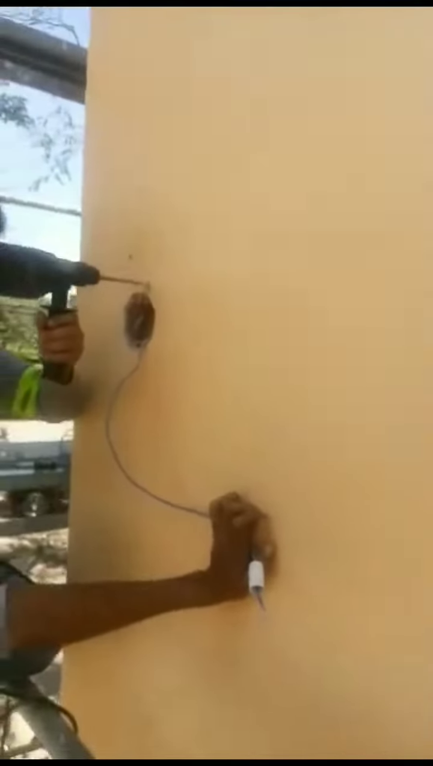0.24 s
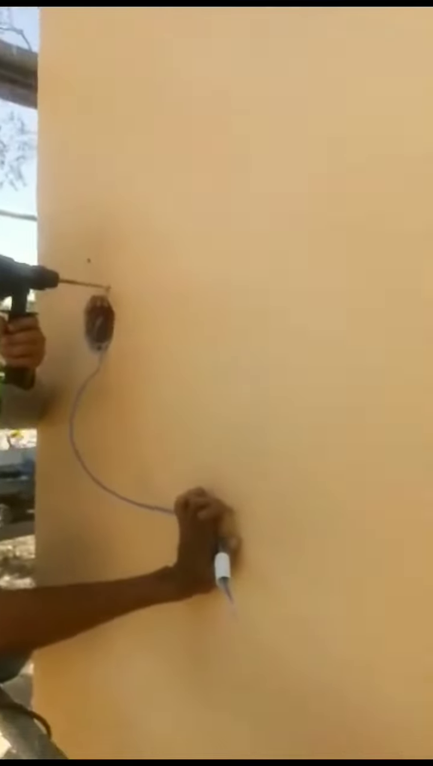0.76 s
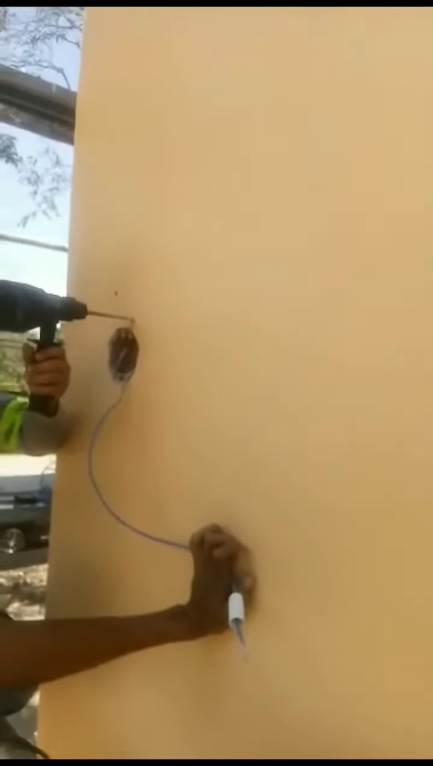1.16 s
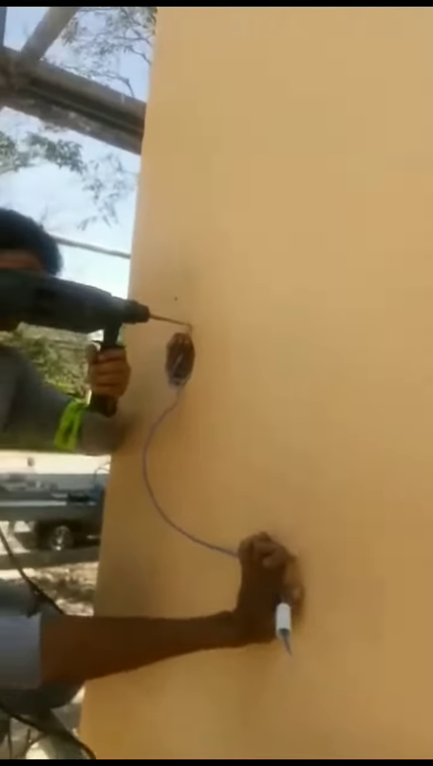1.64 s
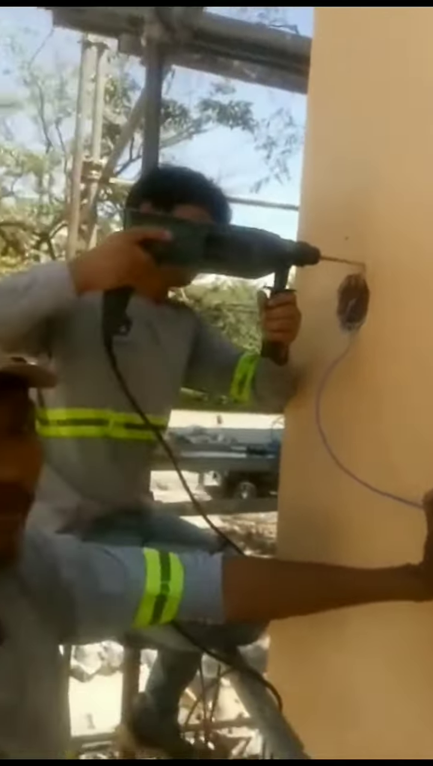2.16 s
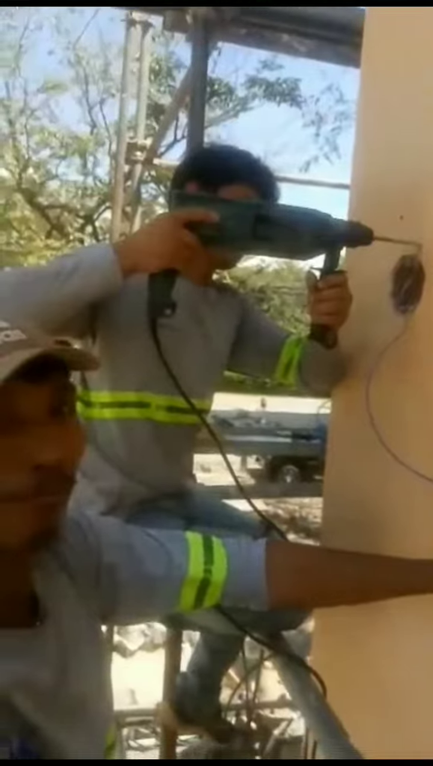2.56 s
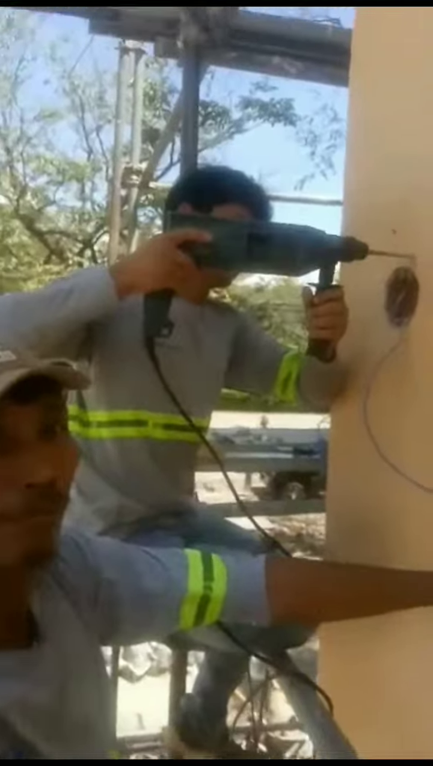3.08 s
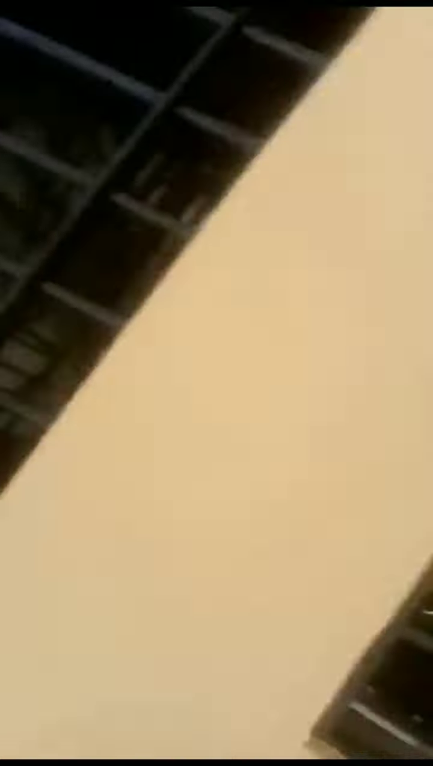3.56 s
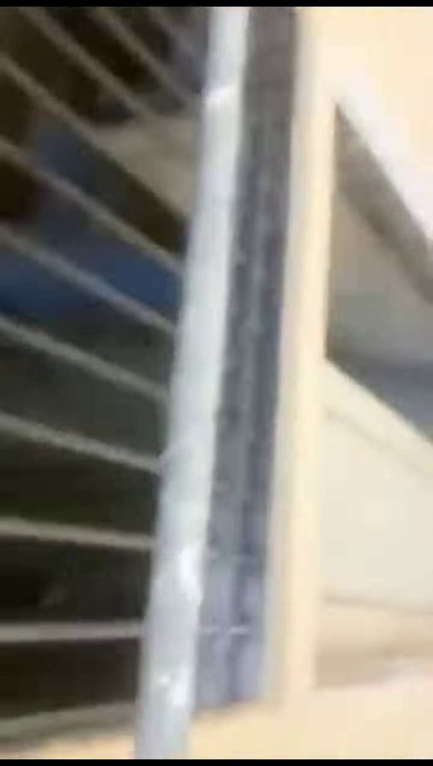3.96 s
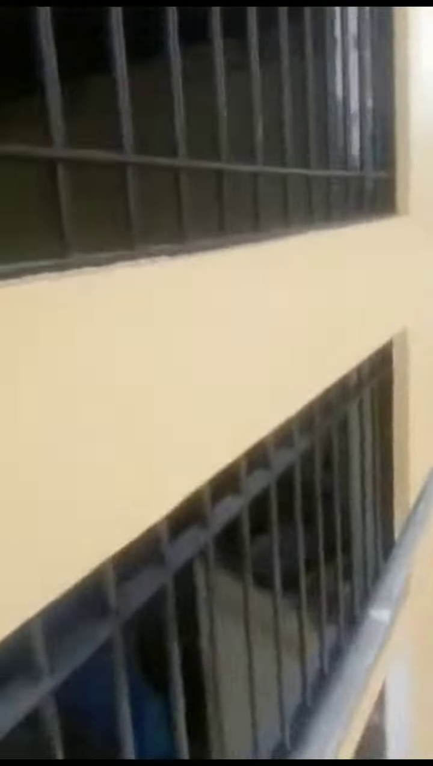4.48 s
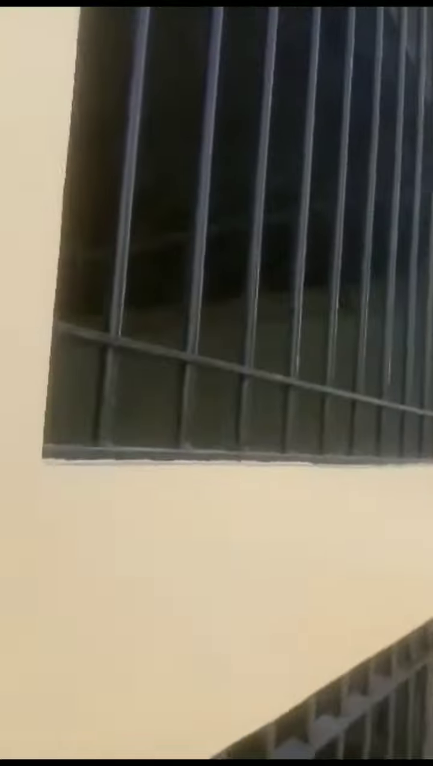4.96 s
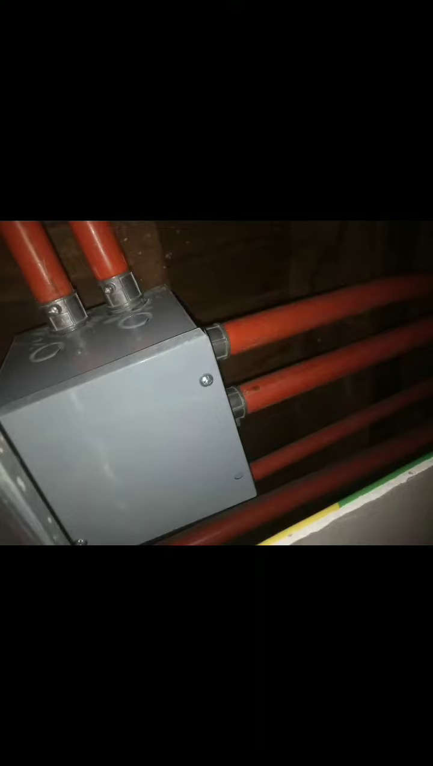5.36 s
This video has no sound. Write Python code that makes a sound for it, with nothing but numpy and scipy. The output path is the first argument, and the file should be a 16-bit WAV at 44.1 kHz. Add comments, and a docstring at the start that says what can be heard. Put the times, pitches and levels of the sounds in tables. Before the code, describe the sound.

A hammer drill is already boring into a plastered masonry wall close to the microphone. Its very fast blows make a bright, ringing steel clatter and a hissing crunch of stone, over a quieter hum from the housing. Faint wind rumbles on the microphone throughout. The motor briefly races and rises in pitch at about 1.3, 1.9, 3.1, 3.7 and 4.4 seconds, sagging back each time. Between 3.3 and 4 seconds fingers knock dully on the microphone as it swings along the wall, and the drill's tone sweeps, dips a little and turns hollow. From about 4.1 seconds the drilling grows louder, with sharp ticks of cracking grit and a few soft, low finger rubs. It is loudest just before all sound cuts off abruptly at about 5 seconds.

```python
"""On a scaffold, close to a plastered masonry wall, a hammer drill bores a hole.
A striker inside hits the bit about sixty times a second, faster whenever the load eases.
Each blow makes steel clatter and stone crunch, while the crank hums through the housing.
Air rumbles on the microphone, and fingers knock and rub it as it swings round beside the wall,
where the bit is louder. Then all sound cuts off."""
import sys
import numpy as np
from scipy import signal
from scipy.fft import rfft, irfft
from scipy.io import wavfile
from scipy.ndimage import uniform_filter1d, map_coordinates

SR = 44100
rng = np.random.default_rng(int(sys.argv[2]) if len(sys.argv) > 2 else 0)


def file_out(sig):
    """Save sig as 16-bit WAV at sys.argv[1]."""
    # one column per channel
    cols = np.atleast_2d(sig).T
    # limit, then scale
    lim = np.clip(cols, -1, 1)
    pcm = np.round(lim * 32767).astype(np.int16)
    wavfile.write(sys.argv[1], SR, pcm)


N = 247842
TIME = np.arange(N) / SR
HZ = np.fft.rfftfreq(4096, 1 / SR)

# Tone colours of air, housing, steel and stone. Each row: frequency in Hz, relative level in dB.
WIND_COLOUR = [(20, -30), (35, -21.5), (60, -4), (100, -2), (160, -4), (260, -9.5), (500, -21),
               (1200, -40.5)]
HOUSING_COLOUR = [(40, -14.5), (130, -11), (350, -2.5), (500, 4.5), (620, -6), (690, 3), (735, 6),
                  (790, -2), (840, -6.5), (1000, 6), (1500, -19.5)]
STEEL_COLOUR = [(500, -34), (830, -22), (950, -13.5), (1500, -8.5), (2200, -12), (2650, -13), (3200, -8.5),
                (4200, -11.5), (6000, -11.5), (7000, -14), (8000, -24.5), (11000, -26)]
STONE_FAR = [(4000, -23.5), (7000, -14), (8200, -7.5), (9400, -3.5), (10300, 1.5), (11200, 3),
             (11700, -1.5), (12400, 2.5), (13200, -7)]
STONE_NEAR = [(4000, -31), (7000, 2), (8200, 4), (9000, 2.5), (9800, 4), (10600, 4.5), (11300, 3.5),
              (12400, 3.5), (13200, -7.5)]
# Fingers sliding on the microphone. Each row: start in seconds, length in seconds, level in dB.
RUBS = [(4.128, 0.21, -40.5), (4.74, 0.1, -44), (4.9, 0.18, -42)]
# Fingers knocking it. Each row: time in seconds, relative level in dB, half the treble cutoff in Hz.
KNOCKS = [(2.109, -38, 644), (2.139, -35.5, 615), (3.347, -24, 600), (3.445, -33.5, 600),
          (3.616, -24.5, 605), (3.77, -33.5, 600), (3.857, -29, 600), (3.929, -23.5, 600)]
# The microphone's path. Each row: time in seconds, place number
# (0 behind the drill, 1 at its side, 2 turned away, 3 along the wall, 4 or more near the bit).
MIC_PATH = [(1, 0), (1.8, 0.82), (2.7, 0.4), (3.33, 0.73), (3.47, 6), (3.72, 5), (4, 2.5), (4.35, 3.5),
            (4.65, 3.5), (4.8, 4)]
# The wall's echo. Each row: time in seconds, delay in seconds, strength as a share of the direct sound.
WALL_ECHO = [(3.26, 0.00005, 0), (3.37, 0.000089, 0.47), (3.45, 0.00011, 0.54), (3.7, .000168, 0.047),
             (3.92, 0.00021, 0.13), (4.3, .00022, 0.26), (4.7, 0.00023, 0.13)]
# Dips in the tone when facing away. Each row: frequency in Hz, width in Hz, depth in dB.
HOLLOWS = [(2360, 490, -4.5), (5480, 430, -4)]
# The load eases and the motor races. Each row: start in seconds, length in seconds.
SURGES = [(1.2605, 0.1775), (1.9209, 0.3251), (3.0753, 0.3237), (3.7417, 0.3043), (4.4248, 0.3817)]
# The bit catches (+) or slips (-). Each row: middle in seconds, length in seconds, change in dB.
CATCHES = [(.26, 0.15, 2.5), (0.392, 0.057, -4.5), (0.792, 0.17, 1.5), (1.069, 0.047, -3.5),
           (1.39, 0.045, 1.5), (1.79, 0.18, -1.5), (1.926, 0.069, 2.5), (2.388, 0.048, -3),
           (2.808, 0.056, 1.5), (2.845, 0.09, -3), (2.903, 0.12, 1.5), (4.394, 0.12, -4),
           (4.483, 0.055, -1.5), (4.747, 0.061, -3.5)]
# The housing's loudness. Each row: time in seconds, relative levels of hum and of shaking in dB.
HOUSING_LEVELS = [(0, -46.5, -49.5), (3, -47.5, -50.5), (3.7, -46.5, -46), (4.35, -43, -44),
                  (4.6, -40.5, -42.5), (5.05, -37, -40)]
# The tones in the crank's hum. Each row: multiple of the blow rate, relative level in dB.
CRANK_TONES = [(1, -8), (2, -1), (3, -1), (4, 0), (5, -3.5), (6, -0.5), (7, -9), (8, -0.5), (9, -4),
               (10, -3.5), (11, 2), (12, -3.5), (13, -7), (14, -5.5)]
# Resonances of the plastic shell. Each row: frequency in Hz, width in Hz, level of the added part in dB.
SHELL_RESONANCES = [(577, 21.8, -0.5), (730.4, 39, 6.5)]
# The loudest grains breaking under the bit. Each row: time in seconds, relative level in dB.
LOUD_CRACKS = [(0.2054, -21), (0.4349, -13), (0.7327, -18), (3.374, -17), (4.1283, -5), (4.2353, -6.5),
               (4.5155, -1), (4.6438, -6), (4.7257, -4), (4.7935, -8), (4.8228, -5.5)]
# Long, thin rings of the bit and the chuck that holds it. Each row: pitch in Hz, relative level in dB.
STEEL_RINGS = [(969, -7), (1196, -7.5), (1253, -0.5), (1824, -3.5), (1938, -3.5), (2334, 1), (2450, 3.5),
               (2750, -3), (4830, -8.5), (4930, -3)]
# The clatter's resonances at each place. Each row: pitch in Hz, rough width in Hz, relative level in dB.
BEHIND = [(977, 170, -5), (1266, 41, 1), (1353, 400, -7), (1940, 350, -5), (2354, 149.0, -6),
          (2374, 8.7, 0.5), (2870, 220, -3.5), (3230, 660, -3.5), (4850, 200, -6.5), (5210, 620.0, -6.5),
          (6590, 332.0, -9.5)]
ASIDE = [(925, 106.0, -8.5), (1354, 230, -6), (1940, 110, -5.5), (2463, 130, -3.5), (2930, 100, -2.5),
         (3580, 640, -4), (4850, 160, -4.0), (6540, 340, -6.5)]
AWAY = [(955.0, 132.0, -16.5), (1446, 118.0, -1), (1974, 58.0, 0), (2890.0, 164.0, -15),
        (4080, 366.0, -10.5), (4832.0, 340, -6), (6354.0, 1400, -10)]
ALONG = [(1290, 42, -7), (1670, 46.0, -5.5), (3070, 500, -3.5), (4040, 530, -3.5), (4800, 440, -7),
         (6440, 920, -1.5)]
NEAR = [(971, 153.0, -12), (1830, 580, -9.5), (3135.0, 237.0, -15.5), (4252.0, 1300, -6), (4840, 500, -3.5),
        (6340, 2100, -12.5)]
# Loudness along the path. Each row: time in seconds, base levels of steel and of stone in dB.
DRILL_LEVELS = [(0, -27, -34.5), (.7, -25.5, -31.5), (1.4, -27.5, -36.5), (2.2, -27, -35),
                (2.6, -27.5, -35.5), (3.05, -27, -34), (3.2, -26, -33.5), (3.39, -27.5, -31.5),
                (3.66, -31, -36), (3.78, -29.5, -31.5), (4.04, -27.5, -34), (4.13, -25, -33),
                (4.5, -24, -31), (4.8, -22, -31), (5.05, -20.5, -30.5)]


def amp(db):
    """Turns decibels into a number to multiply by."""
    return 10 ** (np.asarray(db) / 20)


def unit(x):
    """Scales a signal to an average power of 1."""
    return x / np.sqrt(np.mean(x ** 2) + 1e-20)


def curve(rows, column=1):
    """Joins a table's points in time with straight lines."""
    rows = np.array(rows)
    return np.interp(TIME, rows[:, 0], rows[:, column])


def shape(points):
    """Turns a tone colour table into a gain for every frequency."""
    hz, db = np.transpose(points)
    return amp(np.interp(np.log(HZ + 1), np.log(hz), db))


def colour(x, gain):
    """Gives a sound a tone colour; white noise keeps its power."""
    log_gain = np.log(np.maximum(np.r_[gain, gain[-2:0:-1]], 1e-5))
    taps = np.fft.ifft(np.exp(np.conj(signal.hilbert(log_gain)))).real  # rings only after a hit
    return signal.oaconvolve(x, taps / np.linalg.norm(taps))[:N]


def waver(hz):
    """A random wobble of about size 1, up to the given rate."""
    steps = rng.standard_normal(4000)
    return unit(np.interp(TIME * 2 * hz, np.arange(len(steps)), steps))


def add(mix, start_s, sound):
    """Mixes a sound in at the given time."""
    part = mix[max(round(start_s * SR), 0):][:len(sound)]
    part += sound[:len(part)]


def strikes(turns, spread_db, jitter_s):
    """One click for each turn of the crank, uneven in strength and timing."""
    on_time = np.flatnonzero(np.diff(np.floor(turns)) > 0)
    size, late = rng.standard_normal((len(on_time), 2)).T
    at = on_time + np.round(late * jitter_s * SR).astype(int)
    clicks = np.zeros(N)
    clicks[np.clip(at, 0, N - 1)] = amp(spread_db * np.clip(size, -2, 2))
    return clicks


def linger(power, decay_s):
    """Lets each burst of power die away; the result averages 1."""
    out = signal.lfilter([1], [1, -np.exp(-1 / (decay_s * SR))], power)
    return out / out.mean()


def bursts(turns, decay_s, rebound, grit, scrape, spread_db):
    """Loudness over time of the blows, the bit bouncing back, loose grit and steady scraping."""
    blow = strikes(turns, spread_db, jitter_s=0.00025)
    bounce = strikes(turns + .235, spread_db, jitter_s=.0008)
    grains = np.zeros(N)
    grains[rng.integers(0, N, size=2500)] = amp(2.0 * np.minimum(rng.exponential(size=2500), 4))
    power = linger(blow ** 2, decay_s) + rebound * linger(bounce ** 2, decay_s)
    power += grit * linger(grains ** 2, decay_s=0.00054)
    power = power + .5 * linger(power, decay_s=0.0077) + scrape
    return unit(np.sqrt(np.abs(uniform_filter1d(power, size=20))))


def wind(level_db=-53, gust_db=2.0):
    """Air on the microphone makes a low, lumpy rumble."""
    return colour(rng.standard_normal(N), shape(WIND_COLOUR)) * amp(level_db + gust_db * waver(hz=8.2))


def finger_rubs():
    """Skin drags over the microphone's case with a soft, low scuff."""
    swell = np.zeros(N)
    for start, length, db in RUBS:
        add(swell, start, amp(db) * np.hanning(round(length * SR)))
    scuff = shape([(50, -21.5), (110, -8), (170, 2), (240, -10.5), (600, -36), (2000, -74)])
    return swell * colour(rng.standard_normal(N), scuff)


def finger_knocks(case_hz=95, decay_s=0.0039, snap_s=0.00042, boost_db=4):
    """A finger snaps against the microphone's case, which swings back in one dull thump."""
    out, t = np.zeros(N), TIME[:SR // 25]
    thump = 1.2 * np.sin(2 * np.pi * case_hz * t) * np.exp(-t / decay_s) - 2.5 * np.exp(-t / snap_s)
    for start, db, hz in KNOCKS:
        dulled = signal.lfilter(*signal.butter(1, 2 * hz, fs=SR), thump)
        add(out, start + 0.0011, amp(db + boost_db) * dulled)
    return out


def wall_echo(x):
    """The echo comes later as the microphone swings out, so peaks and dips in the tone slide down."""
    echo = map_coordinates(x, [np.arange(N) - curve(WALL_ECHO) * SR], order=3)
    share = curve(WALL_ECHO, column=2)
    return (x + share * echo) / np.sqrt(1 + share ** 2)


def facing_away(x, place, deepest=1.9, reach=1.5):
    """The drill sounds hollow when the microphone faces away from it."""
    dips_db = sum(db / (1 + (2 * (HZ - hz) / width) ** 2) for hz, width, db in HOLLOWS)
    turned = np.maximum(1 - ((place - deepest) / reach) ** 2, 0)
    return x + turned * (colour(x, amp(dips_db)) - x)


def motor_racing(spin_up_s=.0925, sag_s=.153):
    """How freely the motor runs, 0 to 1: it spins up as the load eases and sags when it returns."""
    free = np.zeros(N)
    for start, length in SURGES:
        rise = 1 - np.exp(-np.clip(TIME - start, 0, length) / spin_up_s)
        sag = np.exp(-np.maximum(TIME - start - length, 0) / sag_s)
        free += (1 - free) * rise * sag
    return free


def bit_grip(uneven_db=0.89):
    """The bit's force on the stone in dB: a little uneven, with a few clear catches and slips."""
    grip_db = uneven_db * waver(hz=14)
    for middle, length, db in CATCHES:
        grip_db += db * np.cos(np.pi * np.clip((TIME - middle) / length, -.5, .5)) ** 2
    return grip_db


def housing(turns, blow_hz, free, grip_db, hum_db=-2.0, shake_db=1.5, racing_db=2.0):
    """Blows shake the housing and the crank hums; a tone swells as it meets a resonance of the shell."""
    hum = np.zeros(N)
    for multiple, db in CRANK_TONES:
        lift = 1 + sum(amp(boost) / (1 + (2 * (multiple * blow_hz - hz) / width) ** 2)
                       for hz, width, boost in SHELL_RESONANCES)
        hum += amp(db + 2.0 * waver(hz=7)) * lift * np.cos(2 * np.pi * (multiple * turns + rng.random()))
    hum = unit(hum) * amp(curve(HOUSING_LEVELS) + hum_db)
    shake = rng.standard_normal(N)
    shake *= bursts(turns, decay_s=0.0084, rebound=.44, grit=.44, scrape=1.3, spread_db=3.5)
    shake = colour(shake, shape(HOUSING_COLOUR))
    shake *= amp(curve(HOUSING_LEVELS, column=2) + shake_db + 0.66 * grip_db)
    return amp(racing_db * free) * (hum + shake)


def grain_cracks(turns, stone_db, decay_s=0.00073, loud_db=-9, small_db=11, chance=.06):
    """Hard grains split with sharp ticks: a few loud ones, and small ones on random blows."""
    ticks = strikes(turns, spread_db=3.5, jitter_s=.0002) * amp(stone_db + small_db)
    ticks *= rng.random(N) < chance
    for start, db in LOUD_CRACKS:
        add(ticks, start + .0007, [amp(db + loud_db)])
    fading = signal.lfilter([1], [1, -np.exp(-1 / (decay_s * SR))], ticks)
    sharp = shape([(600, -32), (1500, -22.5), (4800, 7), (8000, 1.5), (13000, -6), (15000, -35)])
    return colour(fading * rng.standard_normal(N), sharp)


def stone_crunch(turns, place):
    """Every blow snaps stone and crushes it in a short, bright burst."""
    crush = bursts(turns, decay_s=.0028, rebound=.35, grit=.2, scrape=.25, spread_db=2)
    snap_power = linger(strikes(turns - .035, spread_db=2.6, jitter_s=.00015) ** 2, decay_s=.0005)
    snap = colour(rng.standard_normal(N) * np.sqrt(snap_power), shape([(8500, -11), (11500, 0)]))
    breaking = unit(crush * rng.standard_normal(N) + .7 * snap)
    far = unit(colour(breaking, shape(STONE_FAR)))
    near = unit(colour(breaking, shape(STONE_NEAR)))
    nearness = np.clip(place / 1.1, 0, 1)
    return (1 - nearness) * far + nearness * near


def steel_rings(hits, place, half_width_hz=7.52, level_db=-15, db_per_place=-1.0):
    """Steel sings out when an overtone of the blows meets one of its own pitches."""
    peaks = sum(amp(db) ** 2 / (1 + ((HZ - hz) / half_width_hz) ** 2) ** 2 for hz, db in STEEL_RINGS)
    return colour(hits, np.sqrt(peaks)) * amp(level_db + db_per_place * place)


def steel_clatter(turns, place, ring_s=.014, split_hz=2900):
    """Bit and chuck ring alike at each blow and rattle in between; each place has its own tone."""
    t = TIME[:SR // 10]
    ring = rng.standard_normal(len(t)) * np.exp(-t / ring_s)
    ring = irfft(np.exp(1j * np.angle(rfft(ring))))  # equally strong at all pitches
    blows = unit(signal.oaconvolve(strikes(turns, spread_db=2.0, jitter_s=.00003), ring)[:N])
    noise = rng.standard_normal(N)
    low = signal.sosfiltfilt(signal.butter(2, split_hz, fs=SR, output="sos"), noise)
    high = noise - low
    # the heavy chuck rattles on through the gaps; the slim bit dies away between the blows
    chuck = low * bursts(turns, decay_s=.0025, rebound=1.0, grit=1.2, scrape=2.3, spread_db=3.5)
    bit = high * bursts(turns - .03, decay_s=.0018, rebound=.7, grit=1.5, scrape=.8, spread_db=2.5)
    bit *= amp(.5 * waver(hz=43.5))  # the turning bit catches and slips
    hits = unit(0.63 * blows + chuck + bit)
    out = steel_rings(hits, place)
    bass_cut = 1 + (850 / (HZ + 1)) ** 10  # thin steel gives off no bass
    for number, resonances in enumerate([BEHIND, ASIDE, AWAY, ALONG, NEAR]):
        peaks = sum(amp(db) ** 2 / (1 + ((HZ - hz) / (0.69 * width)) ** 2) ** 2
                    for hz, width, db in resonances)
        gain = np.sqrt(shape(STEEL_COLOUR) ** 2 + peaks / bass_cut)
        nearness = np.maximum(1 - abs(place - number), 0)
        out += nearness * colour(hits, gain)
    return out


def scene(loaded_hz=56.927, free_hz=73.486, racing_steel_db=1.0, racing_stone_db=1.5, width_db=-14):
    """The drill is in the middle, louder as it races or catches; a faint, wavering treble above 4 kHz differs
    between the two channels."""
    free, grip_db = motor_racing(), bit_grip()
    blow_hz = loaded_hz + (free_hz - loaded_hz) * free
    turns = np.cumsum(blow_hz) / SR + .28  # crank turns so far, one blow each
    place = np.clip(curve(MIC_PATH), 0, 4)
    steel_db = curve(DRILL_LEVELS) + racing_steel_db * free + grip_db
    stone_db = curve(DRILL_LEVELS, column=2) + racing_stone_db * free + 1.1 * grip_db
    drill = steel_clatter(turns, place) * amp(steel_db) + stone_crunch(turns, place) * amp(stone_db)
    drill = facing_away(wall_echo(drill), place) + grain_cracks(turns, stone_db)
    treble = signal.sosfilt(signal.butter(14, 4100, "high", fs=SR, output="sos"), drill)
    side = amp(width_db) * treble * waver(hz=300)
    mid = drill + housing(turns, blow_hz, free, grip_db) + finger_knocks() + finger_rubs() + wind()
    return np.array([mid + side, mid - side])


def record(dry, stop_s=5.0495, top_hz=13200):
    """Stops all sound at once and takes away the highest treble."""
    cut = dry * np.clip((stop_s - TIME) * SR / 20, 0, 1)
    low_pass = signal.firwin(301, top_hz, window=("kaiser", 8), fs=SR)
    return signal.oaconvolve(cut, low_pass[None], "same")


dry = scene()
out = record(dry)
file_out(out)
```